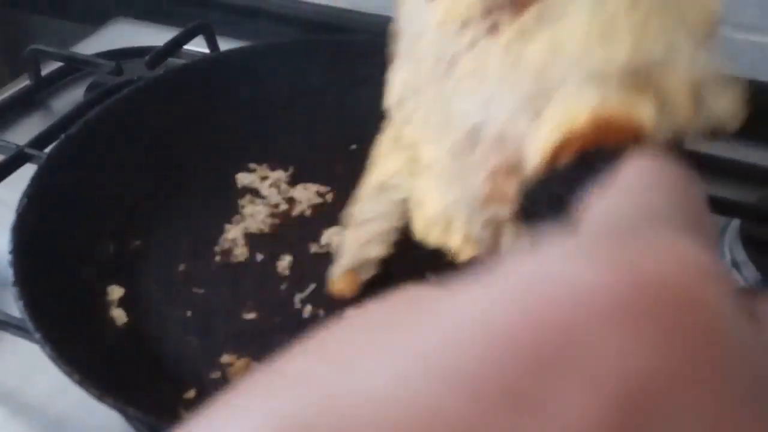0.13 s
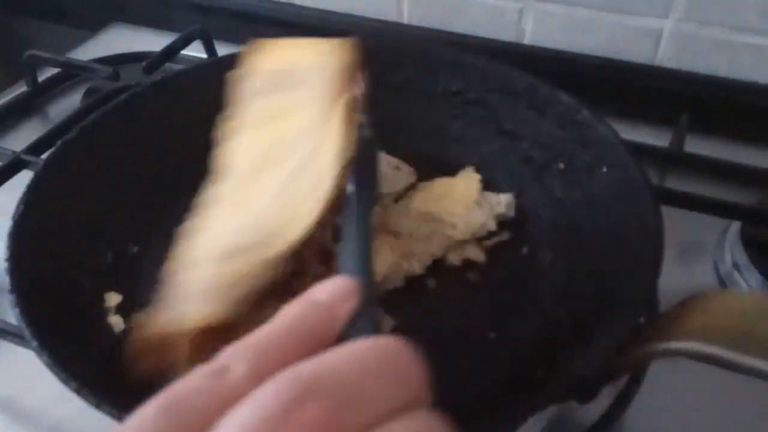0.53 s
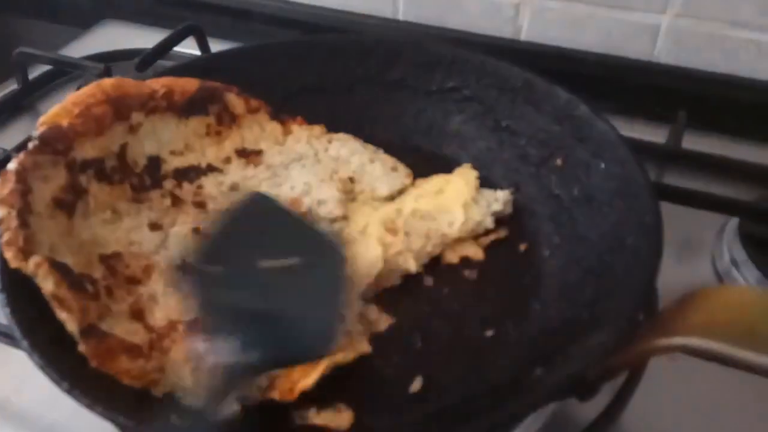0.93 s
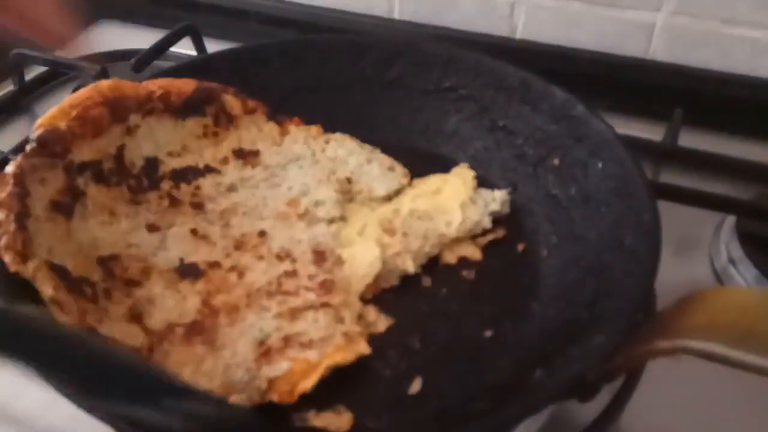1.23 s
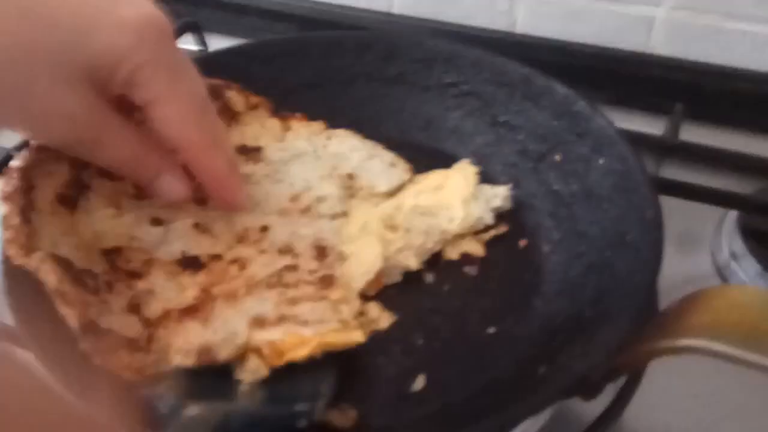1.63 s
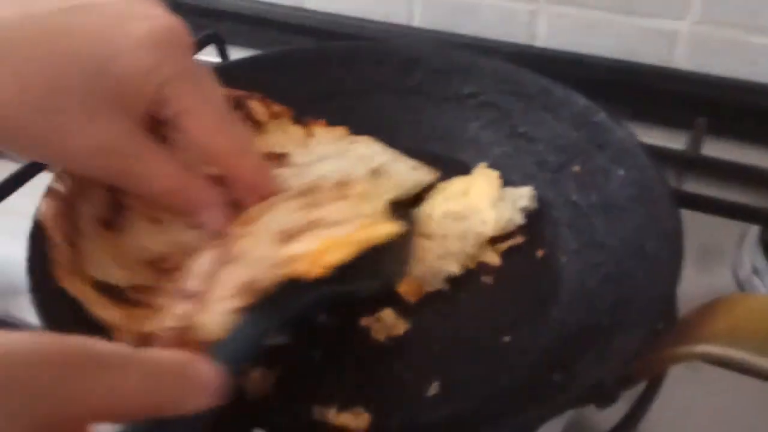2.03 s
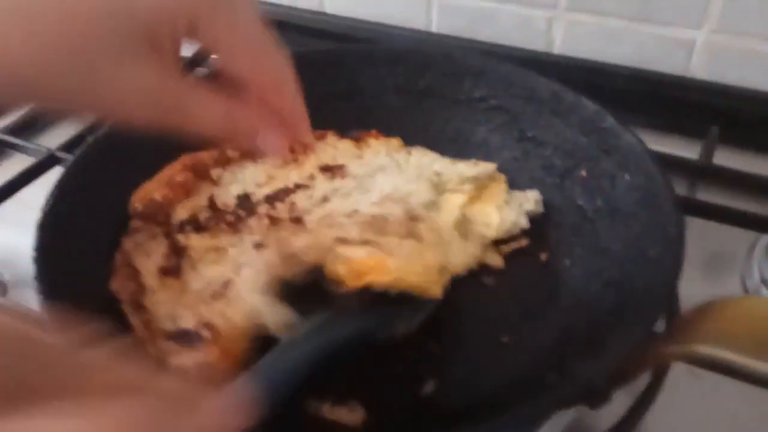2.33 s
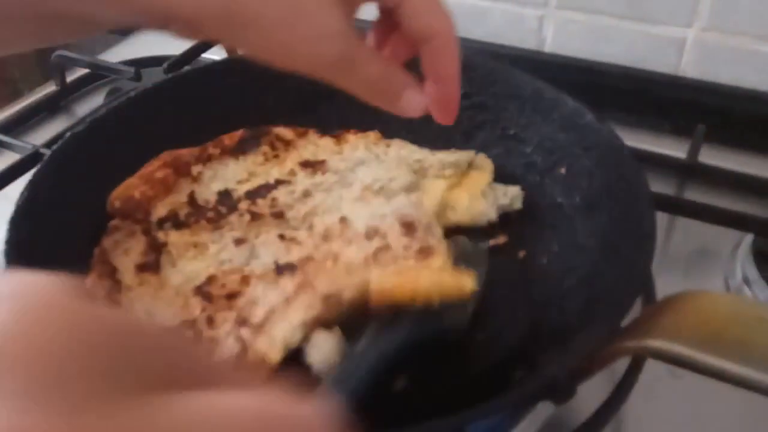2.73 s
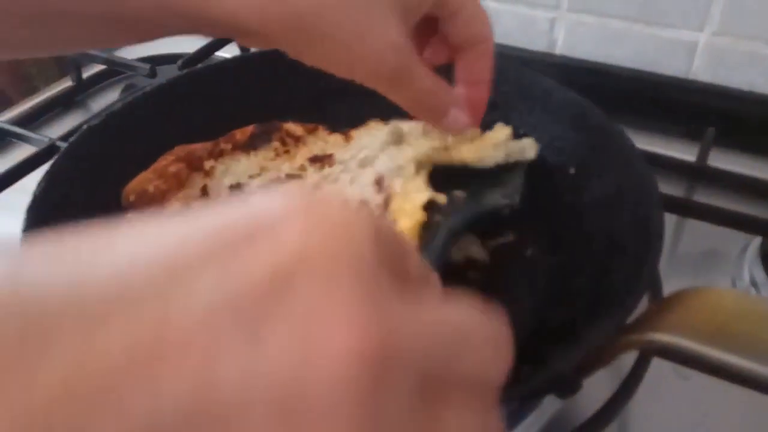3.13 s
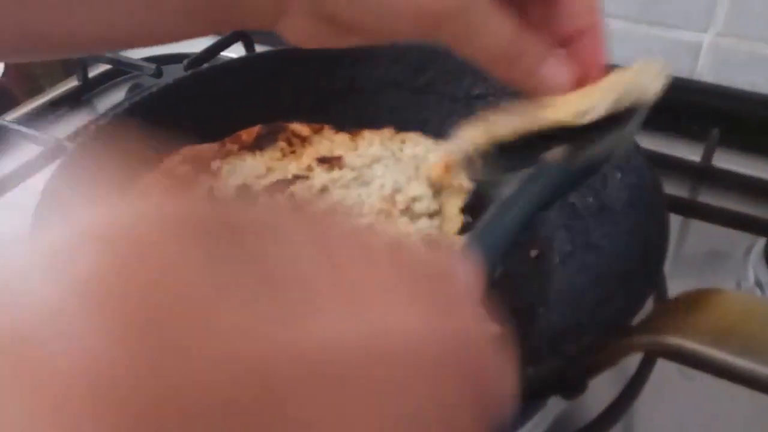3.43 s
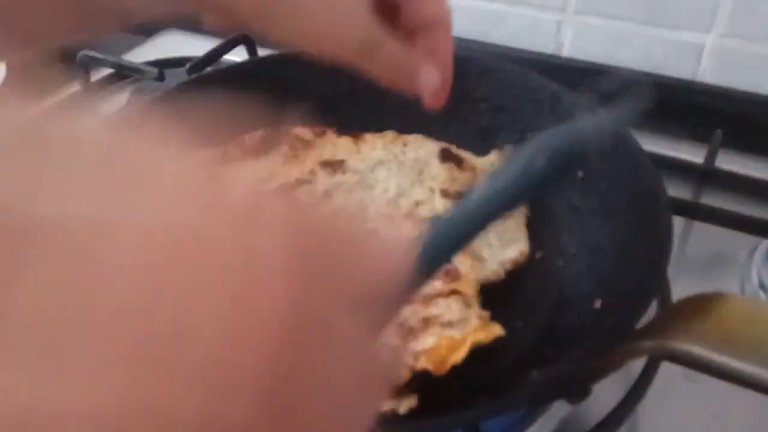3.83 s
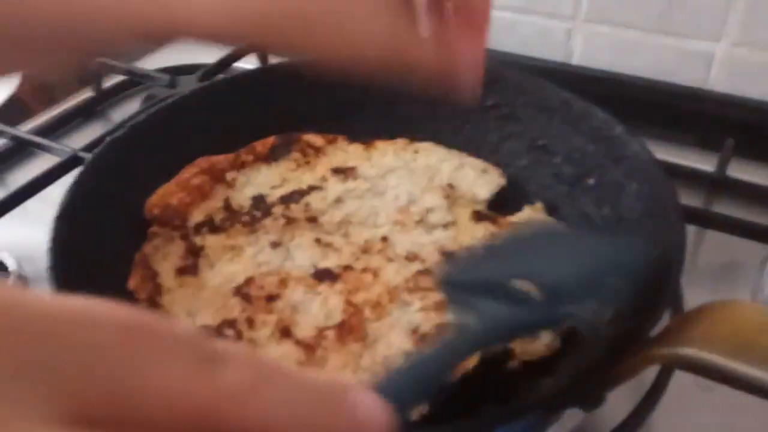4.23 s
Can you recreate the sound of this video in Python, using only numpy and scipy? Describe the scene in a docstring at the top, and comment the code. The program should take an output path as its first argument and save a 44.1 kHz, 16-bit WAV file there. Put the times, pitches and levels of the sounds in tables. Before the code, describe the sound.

A meat pancake sizzles in hot fat, louder once flipped, while a plastic spatula pats it down and knocks the pan.

```python
"""A minced meat pancake sizzles in a hot oiled pan, close to a stereo microphone in a tiled kitchen.
It is flipped, and as its wet side lands countless steam bubbles burst in the fat, with sharper spits
among them. A plastic spatula pats it down, then knocks the pan as it slides under the edge.
Underneath, the gas flame murmurs and the pan shudders on its grate; the tiles answer the frying."""
import sys
import numpy as np
from scipy import signal
from scipy.fft import rfft, irfft, next_fast_len
from scipy.io import wavfile
from scipy.ndimage import uniform_filter1d, map_coordinates

SR = 44100
rng = np.random.default_rng(int(sys.argv[2]) if len(sys.argv) > 2 else 0)


def materialize(psi):
    """Save the field psi as 16-bit PCM at rate SR to the path in sys.argv[1].

    A 1-D psi becomes a single channel; in a 2-D psi each row is a channel.
    """
    bounded = np.clip(np.atleast_2d(psi).T, -1, 1)
    quanta = np.round(bounded * 32767).astype(np.int16)
    wavfile.write(sys.argv[1], SR, quanta)


N = 193276


def amp(db):
    return 10 ** (np.asarray(db) / 20)


def unit(x):
    return x / np.sqrt(np.mean(x ** 2) + 1e-20)


def along(points, hz):
    """Read (Hz, value) points on a log axis."""
    freqs, values = np.transpose(points)
    return np.interp(np.log(hz + 1), np.log(freqs + 1), values)


def curves(rows):
    """One value per sample for each column after the time."""
    times, *columns = np.transpose(rows)
    return [np.interp(np.arange(N) / SR, times, column) for column in columns]


def swells(rows):
    """Smooth humps from (middle in seconds, length in seconds, height) rows."""
    t = np.arange(N) / SR
    return sum(height * np.cos(np.pi * np.clip((t - middle) / length, -.5, .5)) ** 2
               for middle, length, height in rows)


def wobble(rate):
    """A smooth random curve, rate knots a second."""
    knots = rng.standard_normal(int(N * rate / SR) + 4)
    return map_coordinates(knots, [np.arange(N) * rate / SR])


def filtered(x, response):
    """x through a gain that depends on frequency."""
    size = next_fast_len(N + SR // 2)
    return irfft(rfft(x, size) * response(np.fft.rfftfreq(size, 1 / SR)), size)[..., :N]


def coloured(x, spectrum):
    """x with the (Hz, dB) colour, at rms 1."""
    return unit(filtered(x, lambda hz: amp(along(spectrum, hz))))


def band(x, lo_hz, hi_hz):
    """The part of x between two steep edges."""
    return filtered(x, lambda hz: ((1 + (lo_hz / (hz + 1)) ** 20) * (1 + (hz / hi_hz) ** 20)) ** -.5)


def add(track, start_s, sound):
    part = track[round(start_s * SR):][:len(sound)]
    part += sound[:len(part)]


def ring(modes, t, attack_s):
    """Fading modes; neighbours start in opposite phase, so the ring swells before it dies."""
    tones = sum((-1) ** k * amp(db + rng.normal(0, 1.0) - 60 * t / t60) * np.sin(2 * np.pi * hz * t)
                for k, (hz, db, t60) in enumerate(modes))
    return tones * (1 - np.exp(-t / attack_s))


# The tiled room around the stove. Each row: frequency in Hz, T60 in seconds.
ROOM_DECAY = [(200, 0.15), (2000, 0.32), (12000, 0.046)]
def kitchen(x):
    """The room's short answer; it keeps changing, as the bubbles burst all over the pan."""
    out, step = np.zeros(N), SR // 20
    for start in range(0, N, step):
        hz, t, noise = signal.stft(rng.standard_normal(SR // 4), SR, nperseg=256)
        fade = amp(-60 * t / along(ROOM_DECAY, hz)[:, None])
        tail = signal.istft(noise * fade, SR, nperseg=256)[1]
        echo = signal.fftconvolve(x[start:start + step], tail / np.linalg.norm(tail))
        add(out, start / SR + .003, echo)
    return out


# The burner under the pan. Each row: frequency in Hz, spectral level in dB.
FLAME_SPECTRUM = [(25, -26), (70, 2), (115, 9), (170, 2.5), (225, 16), (330, -38), (460, -88), (690, 15),
                  (800, 3.5), (930, 13.5), (1500, -4), (4000, -88)]
def gas_flame():
    """The flame murmurs unsteadily."""
    flicker_db = 4 * wobble(10)
    return amp(-44.5 + flicker_db) * coloured(rng.standard_normal(N), FLAME_SPECTRUM)


# The pan trembling on the grate. Each row: frequency in Hz, spectral level in dB.
SHUDDER_SPECTRUM = [(25, -13), (50, -19), (80, -9.5), (116, 1.5), (160, -20), (215, 0), (320, -26),
                    (600, -23.5), (1200, -37)]
def pan_shudder(idle_db=-56, rise_s=0.0099, t60=0.67):
    """The pan trembles faintly throughout and shudders after every flop, pat and knock."""
    t = np.arange(SR) / SR
    power = amp(idle_db + 2.1 * wobble(9)) ** 2
    fade = amp(-60 * t / t60) * (1 - np.exp(-t / rise_s))
    for contacts, share_db in (MEAT_FLOPS, -8), (SPATULA_PATS, -21.5), (SPATULA_KNOCKS, -15):
        for start, db, *_ in contacts:
            add(power, start, (amp(db + share_db) * fade) ** 2)
    return np.sqrt(power) * coloured(rng.standard_normal(N), SHUDDER_SPECTRUM)


# The limp pancake settling. Each row: start in seconds, level in dB.
MEAT_FLOPS = [(0.708, -14.5), (0.954, -22), (1.061, -18), (1.189, -23), (1.443, -23), (1.542, -28.5),
              (2.13, -36), (2.28, -46), (3.512, -29.5), (3.65, -32), (3.789, -36), (3.949, -36),
              (4.3, -35.5)]
def meat_flops():
    """Soft meat bounces the pan on the grate and stirs only its lowest mode."""
    t, out = np.arange(SR // 2) / SR, np.zeros(N)
    for start, db in MEAT_FLOPS:
        add(out, start, amp(db) * ring([(124, 0, 0.2)], t, attack_s=0.0086))
    return out


# The blade sliding under the meat. Each row: middle in seconds, length in seconds, level in dB.
BLADE_SLIDES = [(2.114, 0.14, -54), (2.988, 0.037, -48), (3.262, 0.1, -47.5), (3.448, 0.091, -40),
                (3.823, 0.15, -46), (4.06, 0.077, -45), (4.328, 0.12, -43.5)]
# Plastic on the pan. Each row: frequency in Hz, spectral level in dB.
RUB_SPECTRUM = [(40, -4), (250, 5.5), (500, -1.5), (750, 0), (1200, -6), (4000, -27), (12000, -48)]
def spatula_rub():
    """The blade rubs for a moment after each pat and knock, and all through each slide."""
    t, contact = np.arange(SR) / SR, np.zeros(N)
    for start, db, slap_db in SPATULA_PATS:
        add(contact, start, amp(db + slap_db - 60 * t / 0.29))
    for start, db, *_ in SPATULA_KNOCKS:
        add(contact, start, amp(db - 60 * t / 0.21))
    sliding = swells([(middle, length, amp(db)) for middle, length, db in BLADE_SLIDES])
    return (amp(-17.5) * contact + sliding) * coloured(rng.standard_normal(N), RUB_SPECTRUM)


# The pan ringing freely. Each row: frequency in Hz, level in dB, T60 in seconds.
FREE_PAN_MODES = [(116, -14, .45), (210, -8, .2), (231, 0, .5), (256, -11, .25), (275, -14, .9),
                  (292, -14, .2), (398, -10, .5), (598, -27, .7), (755, -29, .7), (903, -24, .7)]
# Blows on the bare pan. Each row: start in seconds, level in dB, cutoff in Hz, ring time multiplier.
SPATULA_KNOCKS = [(0.386, -28.5, 260.6, 1.9), (2.556, -15.5, 1500, 1), (2.6, -20, 304, 1),
                  (3.447, -29, 274, 2.5)]
def spatula_knocks():
    """Knocks leave the pan free to ring; soft ones reach only its low modes."""
    t, out = np.arange(SR) / SR, np.zeros(N)
    for start, db, cutoff_hz, sustain in SPATULA_KNOCKS:
        modes = [(hz, mode_db - 10 * np.log10(1 + (hz / cutoff_hz) ** 12), t60 * sustain)
                 for hz, mode_db, t60 in FREE_PAN_MODES]
        add(out, start, amp(db) * ring(modes, t, attack_s=.004))
    return out


# The pan held down on the grate. Each row: frequency in Hz, level in dB, T60 in seconds.
HELD_PAN_MODES = [(117.3, -21, .26), (216.9, -2.5, 0.24), (236, 0, 0.048), (557, -28.5, 0.7),
                  (726, -27, 0.5), (945, -45, 0.57)]
# The spatula pressing on the meat. Each row: start in seconds, level in dB, slap trim in dB.
SPATULA_PATS = [(0.764, -9.5, 1), (.909, -6, -0.5), (1.016, -6.5, 0.5), (1.123, -13, 0.5), (1.22, -24.5, 8),
                (1.368, -19.5, 2), (1.407, -14.5, -4), (1.453, -17, -5), (1.565, -40.5, 22),
                (1.647, -28, 12), (1.668, -42, 15)]
def spatula_pats():
    """Soft pats thud through the meat and rock the pan, each with a short wet slap."""
    t, out = np.arange(SR) / SR, np.zeros(N)
    slap = amp(-3 - 60 * t / 0.01) * np.sin(2 * np.pi * 480 * t)
    for start, db, slap_db in SPATULA_PATS:
        thud = ring(HELD_PAN_MODES, t, attack_s=.003)
        add(out, start, amp(db) * (thud + amp(slap_db) * slap))
    return out


# Single drops of fat. Each row: start in seconds, level in dB, pitch in Hz.
FAT_SPITS = [(0.363, -13.5, 5530), (0.607, -12, 5930), (0.629, -6, 3760), (0.915, -8, 3440),
             (1.66, -10, 2800), (1.895, -16, 4930), (2.12, -25, 6000), (2.1635, -4.5, 2460),
             (2.422, -10, 6000), (3.846, -9.5, 3050), (4.124, -16, 3540)]
def fat_spits(t60=0.0059):
    """A drop explodes: a short ring with a crack."""
    t, out = np.arange(SR // 50) / SR, np.zeros(N)
    for start, db, hz in FAT_SPITS:
        pop = np.sin(2 * np.pi * hz * t) + 0.89 * rng.standard_normal(len(t))
        add(out, start, amp(db - 60 * t / t60) * pop)
    return band(out, 1500, 15000)


# Frying, close to the microphone. Each row: frequency in Hz, spectral level in dB.
FRYING_SPECTRUM = [(350, -134), (520, -11), (700, -12.5), (950, -8), (1700, -8.5), (2500, -2.5), (5000, 0),
                   (6600, 2.5), (7900, -6.5), (10200, -1), (12500, -4), (14000, -8), (14700, 8.5),
                   (15500, 1)]
# Wet meat touching down. Each row: start in seconds, level in dB, T60 in seconds, spray boost in dB.
STEAM_FLASHES = [(.184, -24.5, 0.096, 7), (0.196, -23, 0.07, 4), (0.365, -12.5, 0.044, 0),
                 (0.401, -18, 0.06, 13), (.628, -15, 0.15, 0), (1.404, -11, 0.058, -6),
                 (1.895, -32, 0.011, 5), (2.1905, -17, .03, 2), (2.221, -22, .04, 7),
                 (2.242, -20, 0.025, 12)]
def steam_flashes(spray_hz=7700):
    """Juice flashes to steam on hot metal: a burst of hiss, brighter where it gets out freely."""
    t, low_level, spray_level = np.arange(SR // 4) / SR, np.zeros(N), np.zeros(N)
    for start, db, t60, spray_db in STEAM_FLASHES:
        burst = amp(db - 60 * t / t60) * (1 - np.exp(-t / 0.00085))
        add(low_level, start, burst)
        add(spray_level, start, amp(spray_db) * burst)
    hiss = coloured(rng.standard_normal(N), FRYING_SPECTRUM)
    spray = band(hiss, spray_hz, SR)
    return low_level * (hiss - spray) + spray_level * spray


def bubbles(lo_hz, hi_hz, per_second, cycles, spread_db, flutter_db):
    """Bursting bubbles, each a tiny damped ring of its own pitch and size, over hissing steam; rms 1."""
    count = int(per_second * N / SR)
    when, pitch_draw, life_draw, size_draw = rng.random((count, 4)).T[:, :, None]
    hz = np.minimum(lo_hz / 2 + pitch_draw * (hi_hz * 1.2 - lo_hz / 2), SR / 2)
    decay_cycles = cycles * (.5 + life_draw)
    size = amp(-spread_db * np.log(size_draw + .004))
    age = np.arange(min(int(5 * cycles * SR / hi_hz) + 16, 250))  # in samples
    turns = hz * age / SR
    pops = size * np.sin(2 * np.pi * turns) * np.exp(-turns / decay_cycles) * hz / hi_hz
    positions = (when * N).astype(int) + age
    crackle = np.bincount(positions.ravel(), pops.ravel(), N)[:N]
    steam = rng.standard_normal(N)
    mix = unit(band(crackle, lo_hz, hi_hz)) + unit(band(steam, lo_hz, hi_hz))
    return unit(coloured(mix, FRYING_SPECTRUM) * amp(flutter_db * wobble(45)))


def clustered(x, depth_db):
    """Bubbles of like size come in clusters, so narrow bands swell and fade."""
    spectra = signal.stft(x, nperseg=512)[2]
    patches = uniform_filter1d(rng.standard_normal(spectra.shape), size=4, axis=0)
    patches = uniform_filter1d(patches, size=9, axis=1)
    return signal.istft(spectra * amp(depth_db * unit(patches)), nperseg=512)[1][:N]


# The boil jumps as the wet side lands; meat lying flat shuts the spray in.
# Each row: time in seconds, boil level in dB, escaping spray in dB above that level.
FAT_BOIL = [(0, -37.5, 1.5), (0.15, -37, 4.5), (0.27, -31, 2.5), (0.36, -34.5, 4), (0.367, -25.5, 0),
            (0.42, -23.5, 7), (0.88, -20, -2.5), (1.03, -21.5, -2), (1.58, -22.5, -1.5),
            (1.67, -19.5, -0.5), (1.82, -22, 4.5), (2.32, -19.5, 0), (2.9, -21, 2.5), (3.14, -22.5, 3.5),
            (3.27, -22, 2), (3.39, -18, 1.5), (3.5, -20, 1.5), (3.95, -19.0, -1), (4.38, -20.5, 1.5)]
# Juice squeezed onto the hot metal. Each row: crest in seconds, length in seconds, swell in dB.
JUICE_SQUEEZES = [(.53, .1, 1.5), (.73, 0.16, 2.5), (.875, .1, 2.5), (1.15, 0.12, 1.2), (1.46, .14, 2.2)]
# The meat coming off the metal. Each row: trough in seconds, length in seconds, dip in dB.
BOIL_LULLS = [(.6, 0.045, -2.5), (1.57, 0.067, -1.5), (1.88, 0.066, -2.5), (2.11, 0.31, -2.5),
              (2.52, 0.041, -1.5), (3.19, 0.084, -0.8), (3.87, 0.047, -3.5)]
# Trapped juice under the lifted edge. Each row: crest in seconds, length in seconds, boost in dB.
EDGE_GURGLES = [(1.675, 0.13, 3.5), (2.37, 0.19, 1)]
def sizzle():
    """Three sizes of bubble share one boil and its spurts; shut-in steam makes big ones, not spray."""
    boil_db, escape_db = curves(FAT_BOIL)
    big_db = -13 + .95 * boil_db - .52 * escape_db + swells(EDGE_GURGLES)
    big = bubbles(657, 2575, per_second=1800, cycles=3.2, spread_db=2.0, flutter_db=1.07)
    small = bubbles(2680, 8220, per_second=5000, cycles=2.9, spread_db=2.0, flutter_db=0.62)
    spray = bubbles(8420, 14840, per_second=5500, cycles=5.9, spread_db=0, flutter_db=0.6)
    boil = amp(big_db) * big + amp(boil_db - 0.3) * small + amp(boil_db + escape_db) * spray
    spurts_db = swells(JUICE_SQUEEZES) + swells(BOIL_LULLS) + 0.7 * wobble(70) + 0.14 * wobble(510)
    return clustered(boil, depth_db=1.37) * amp(spurts_db)


# The room reaching the microphone from the sides. Each row: frequency in Hz, gain in dB.
SIDE_GAIN = [(2500, -83), (4600, -69), (5600, -36), (9000, -10), (14000, -20.5), (15000, -10.5)]
def scene():
    """The pan is close and dead centre; only the room's treble spreads a little to the sides."""
    frying = sizzle() + steam_flashes() + fat_spits()
    room = amp(-12.0) * kitchen(frying)
    handling = meat_flops() + spatula_pats() + spatula_knocks() + spatula_rub()
    mid = frying + room + handling + pan_shudder() + gas_flame()
    side = filtered(kitchen(frying), lambda hz: amp(along(SIDE_GAIN, hz)))
    return np.array([mid + side, mid - side])


def record(dry):
    """The recorder keeps nothing above its band limit."""
    return filtered(dry, lambda hz: hz < 15560)


dry = scene()
out = record(dry)
materialize(out)
```